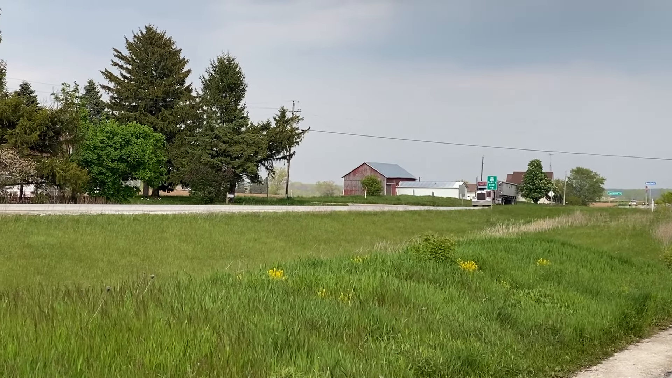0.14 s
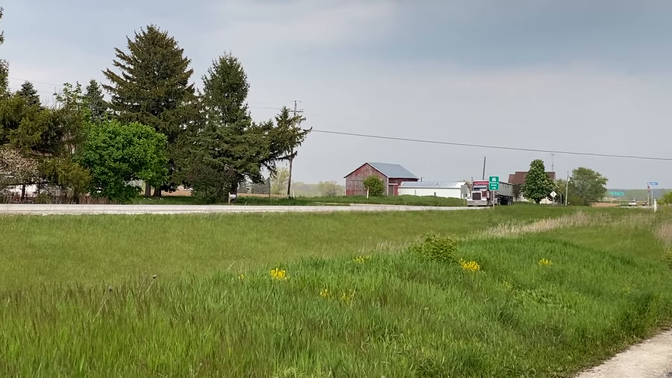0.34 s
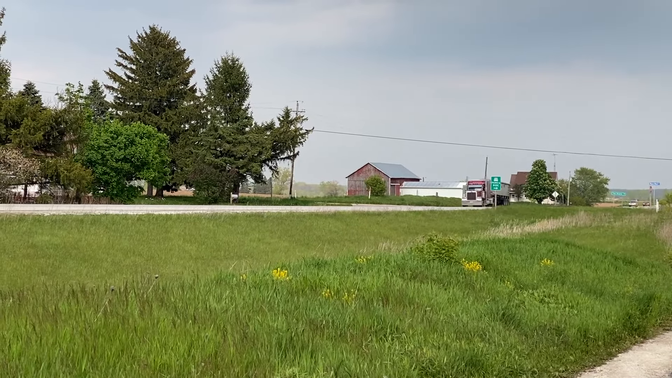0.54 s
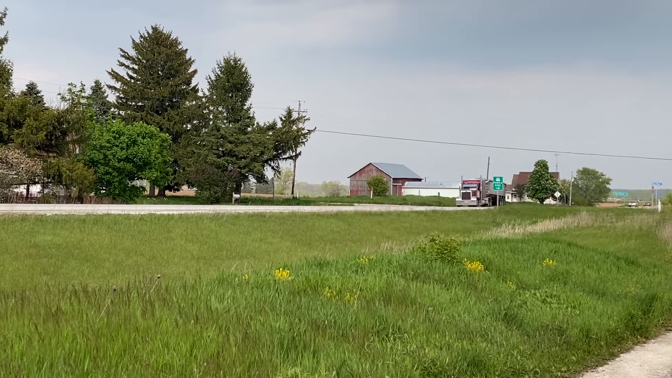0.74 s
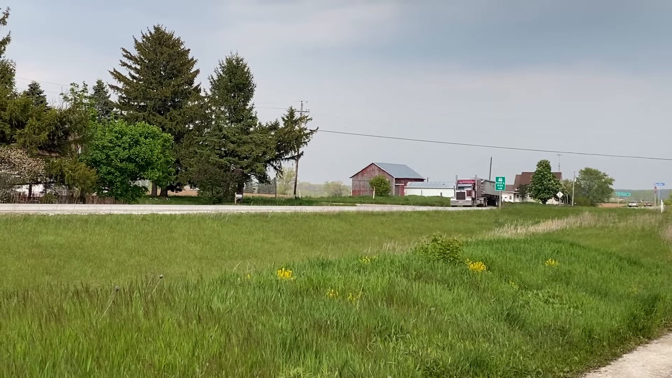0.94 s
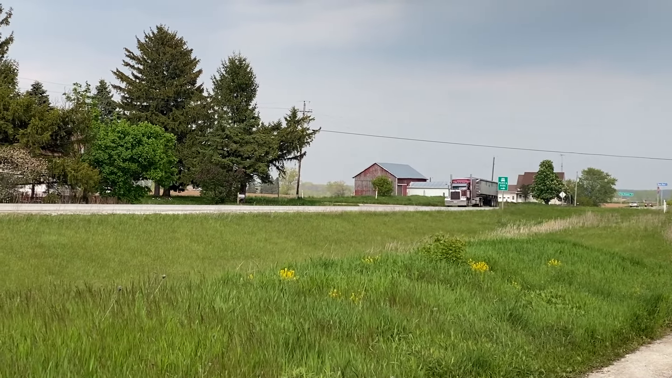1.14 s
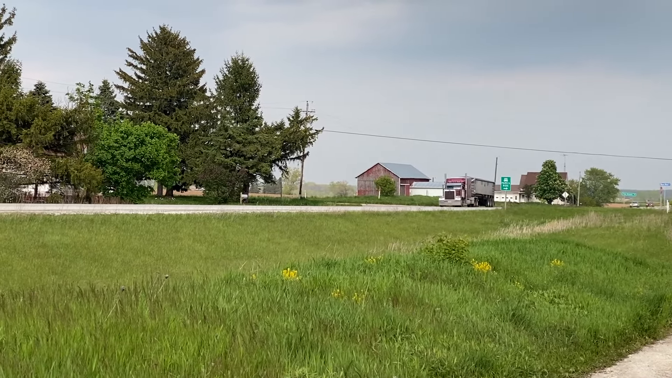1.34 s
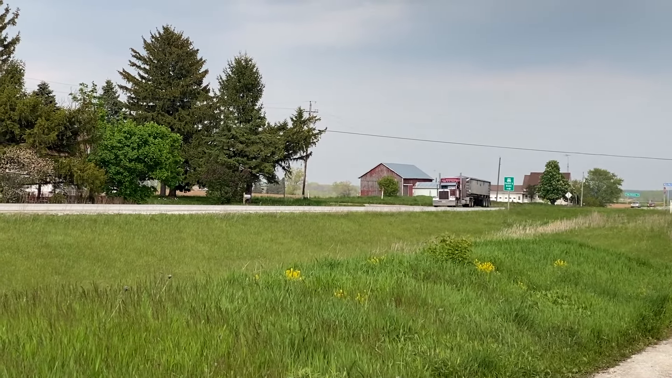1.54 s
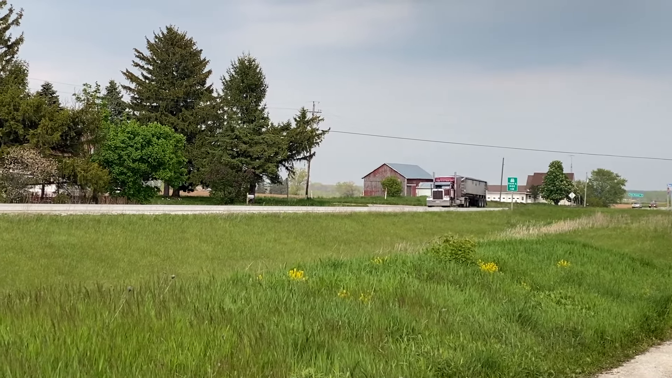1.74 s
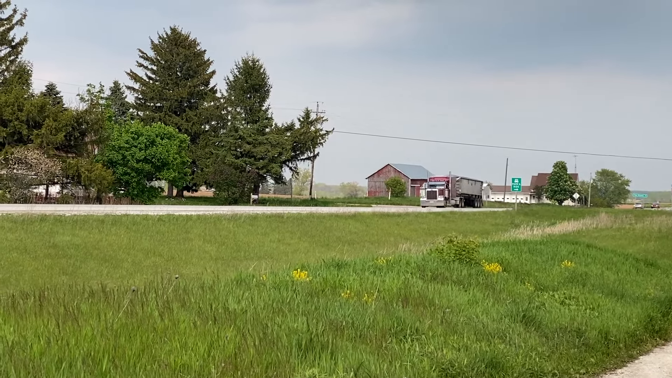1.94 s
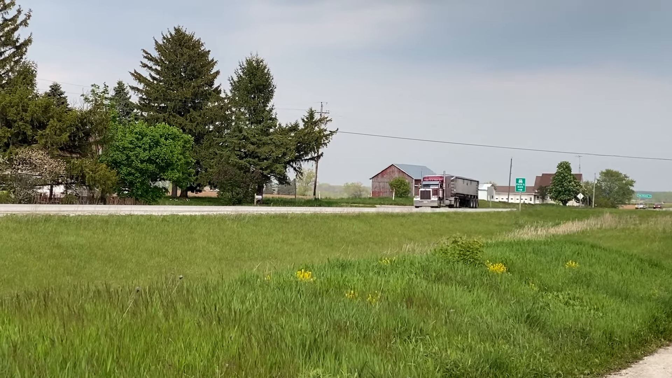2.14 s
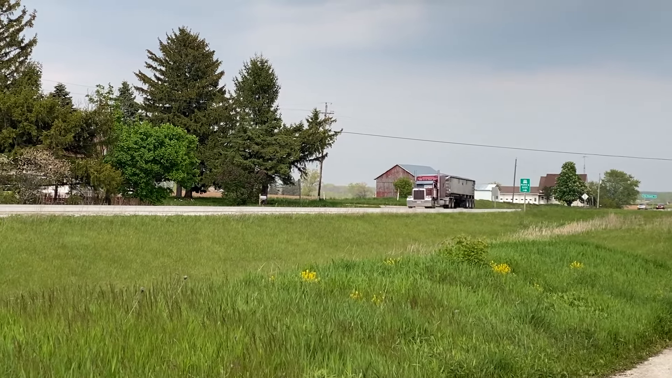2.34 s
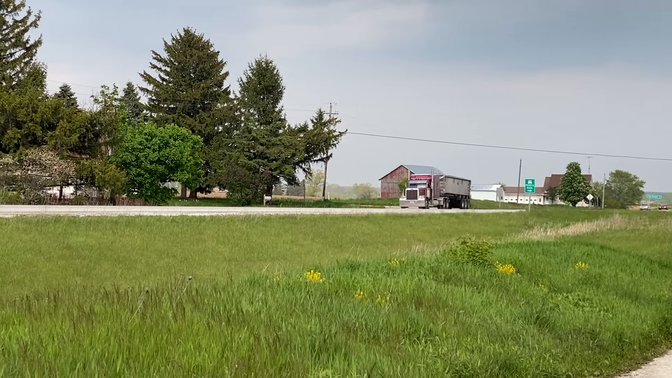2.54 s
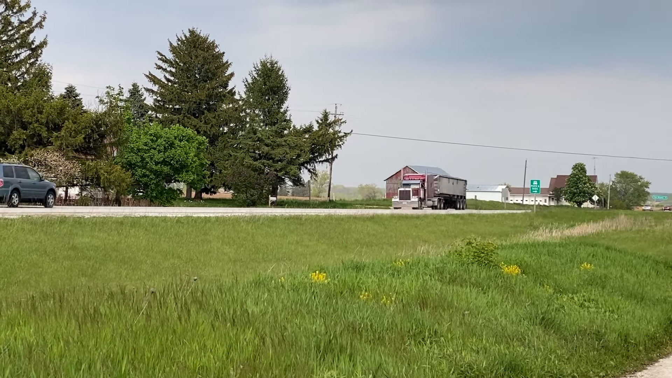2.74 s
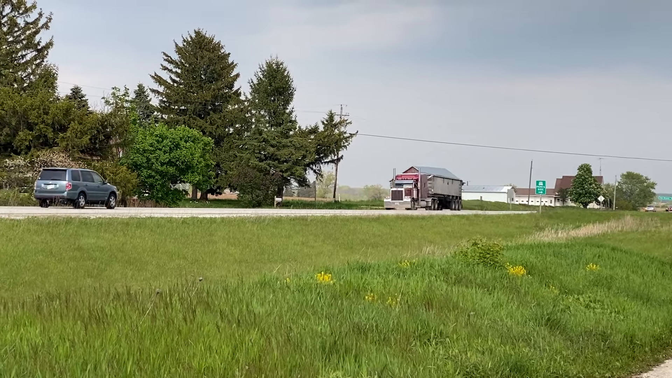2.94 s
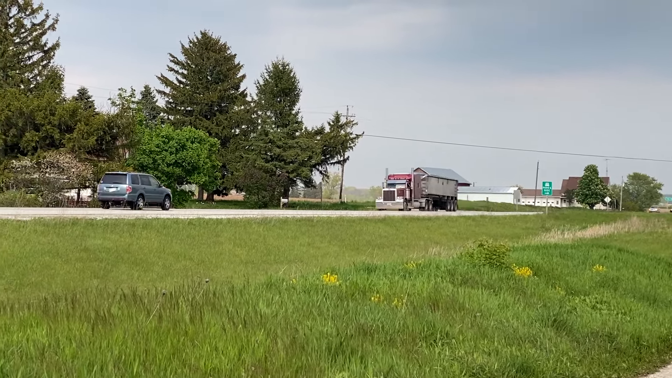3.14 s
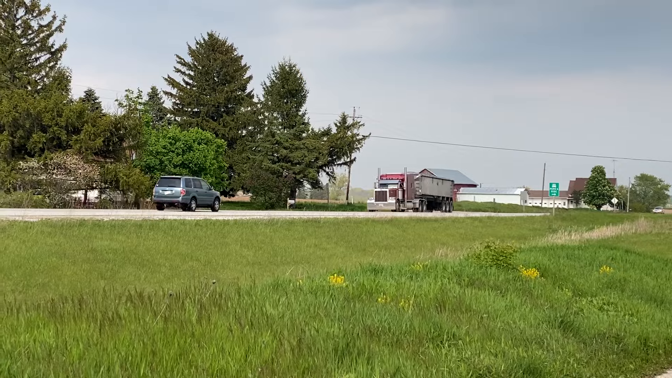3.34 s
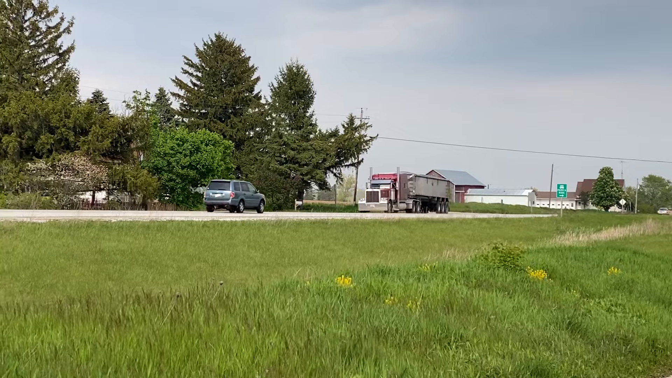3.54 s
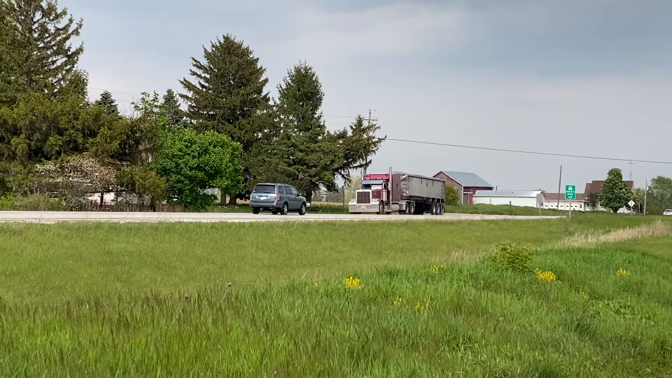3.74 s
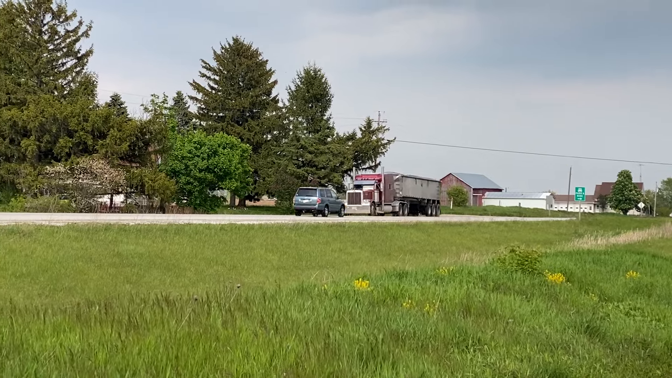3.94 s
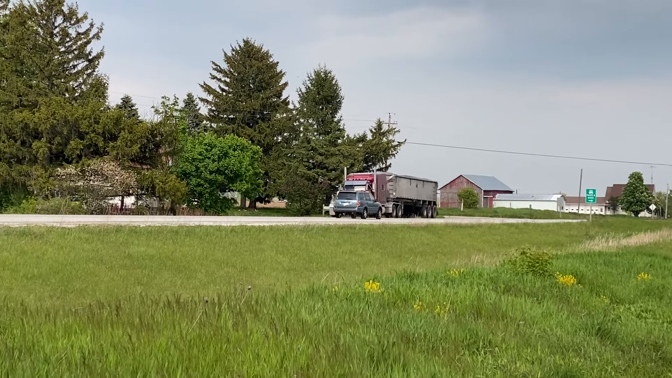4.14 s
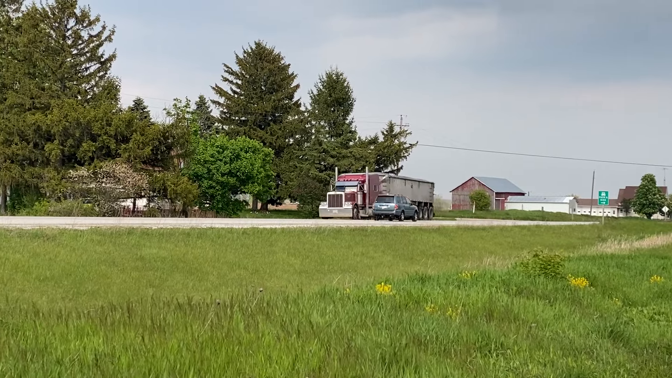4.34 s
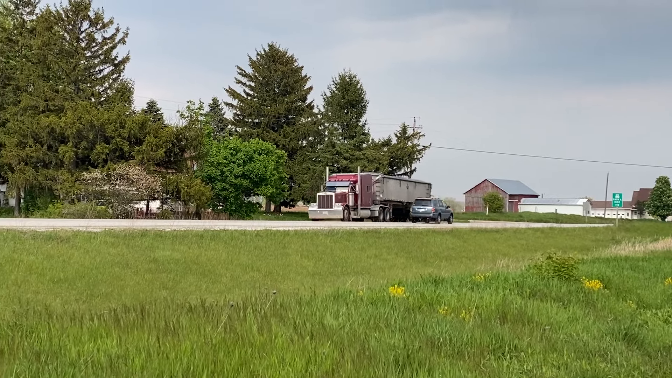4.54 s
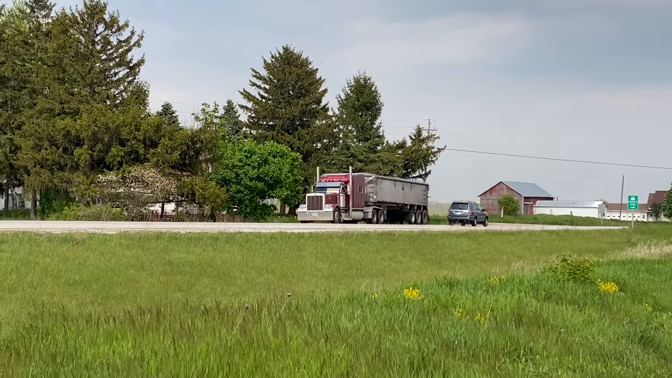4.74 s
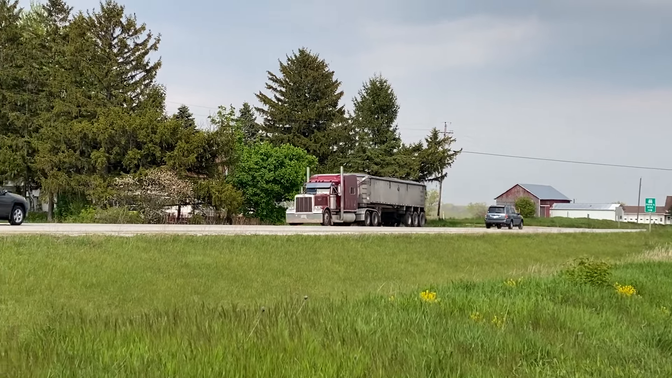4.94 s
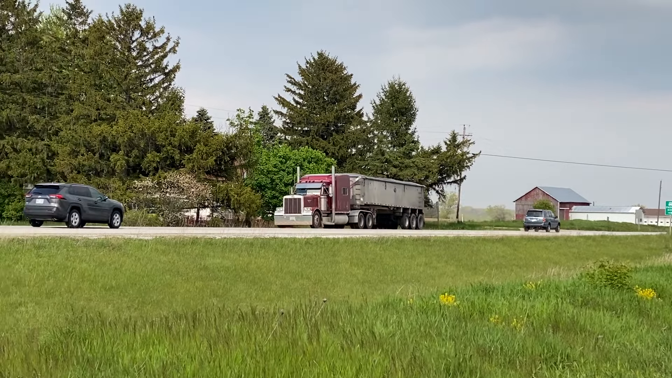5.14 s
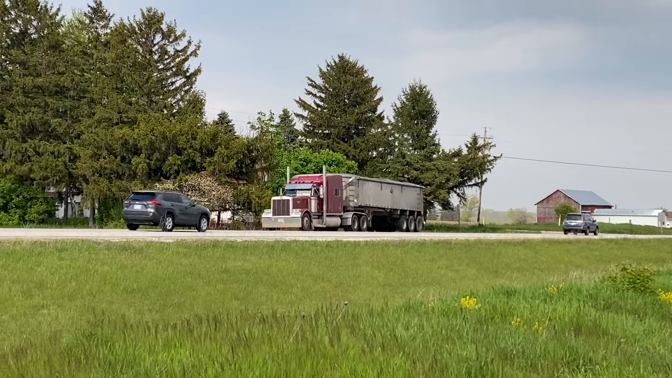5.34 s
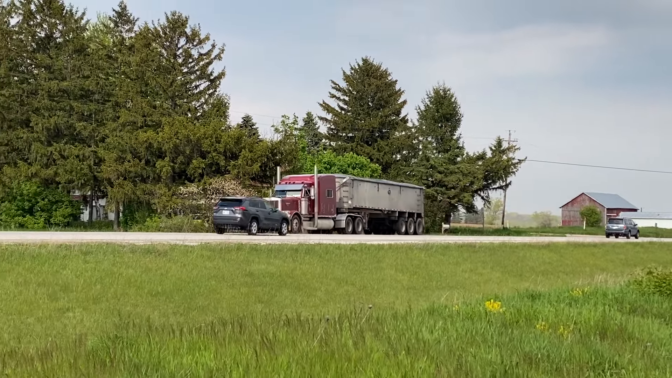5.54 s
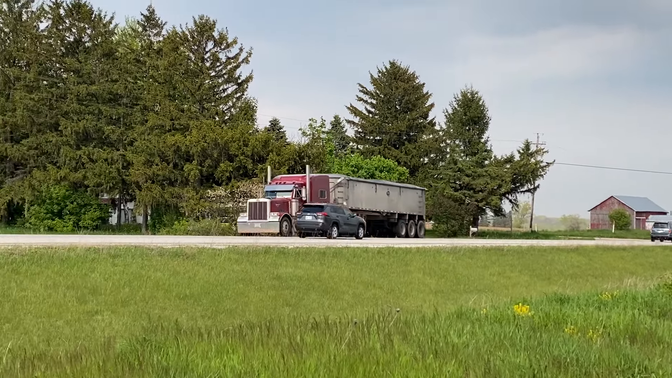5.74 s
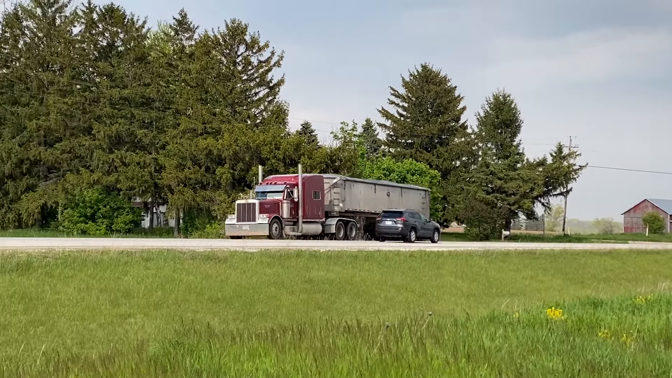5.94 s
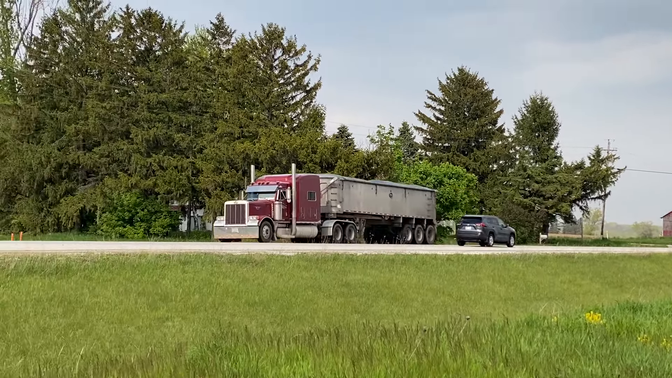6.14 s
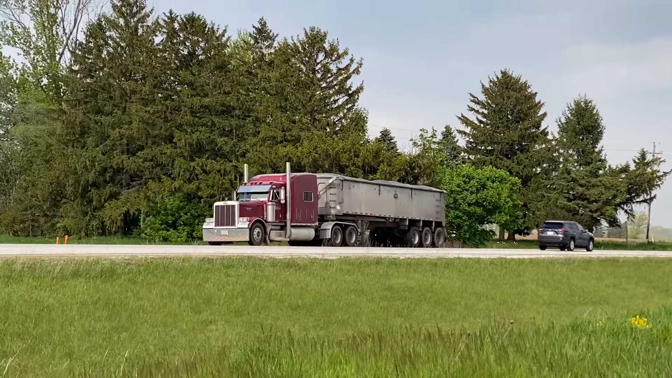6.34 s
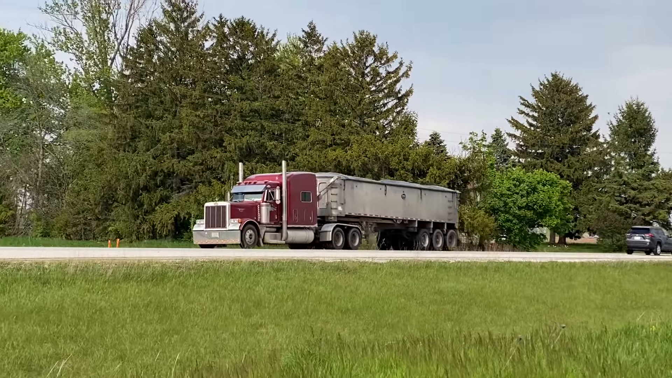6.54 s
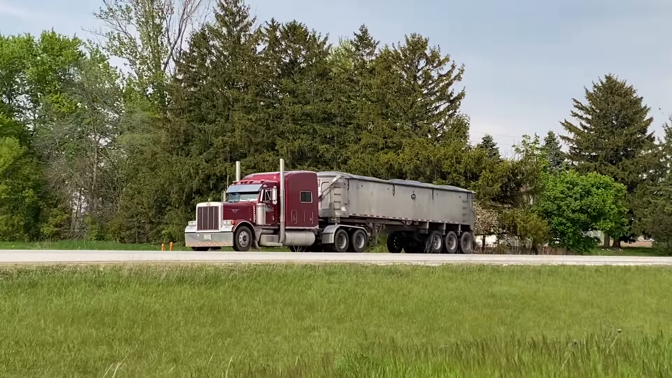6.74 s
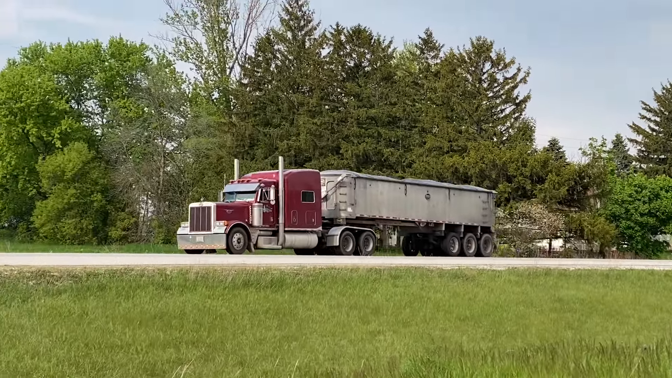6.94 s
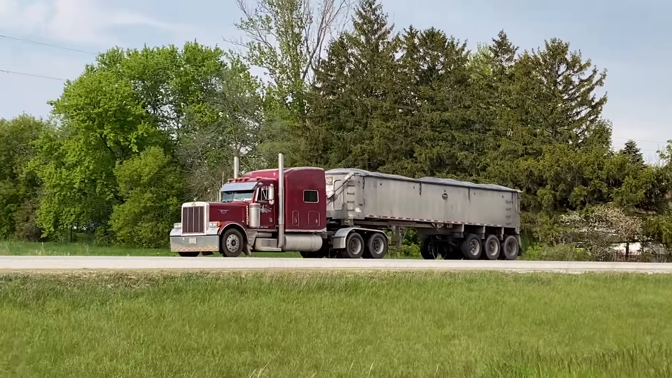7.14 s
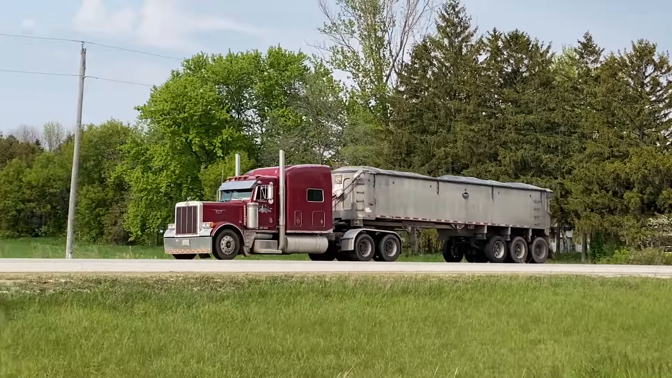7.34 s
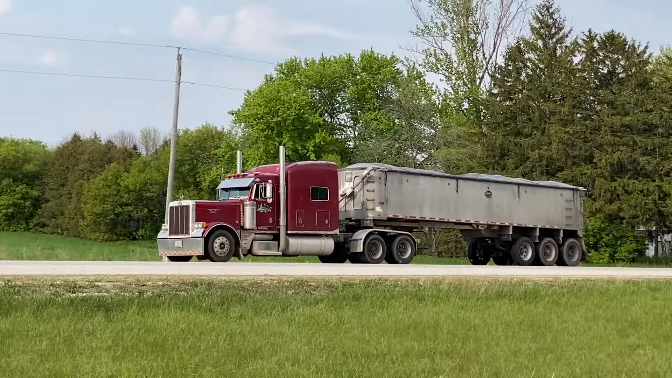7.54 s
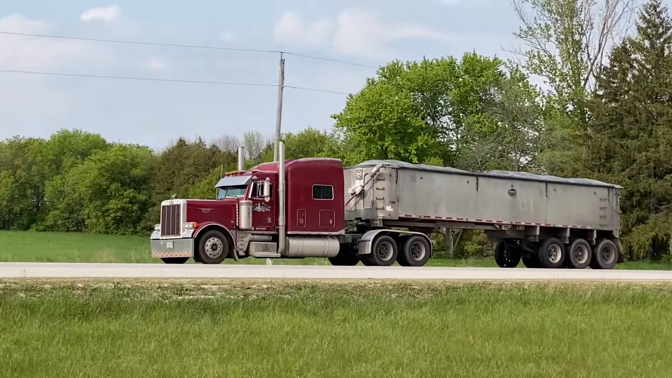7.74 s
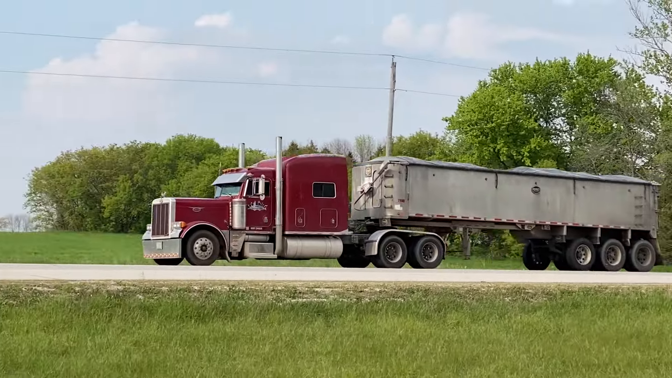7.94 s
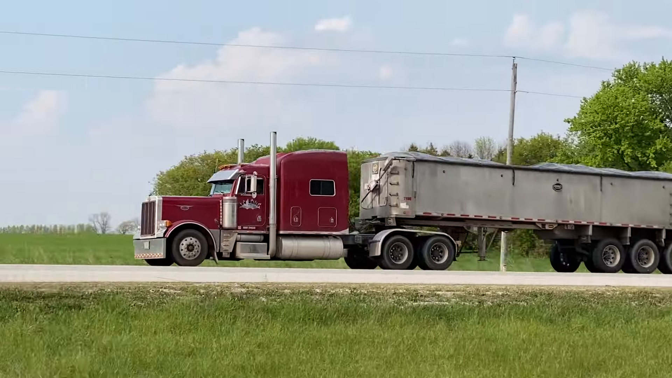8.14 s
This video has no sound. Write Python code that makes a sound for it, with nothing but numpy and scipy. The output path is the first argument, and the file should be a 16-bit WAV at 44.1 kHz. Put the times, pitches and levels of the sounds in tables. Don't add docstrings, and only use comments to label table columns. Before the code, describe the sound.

A stereo microphone across a grass verge hears country traffic. Car tyres hiss away to the left over a distant truck's deep, pulsing engine. Exhaust pops crackle around two seconds, followed by a small falling bird whistle and soft wind thumps. From about six seconds the truck is close: broad tyre roar, uneven diesel throb, high turbo whistle and light ticking from loose trailer fittings.

```python
import sys
import numpy as np
from scipy import signal
from scipy.fft import rfft, irfft, next_fast_len
from scipy.io import wavfile
from scipy.ndimage import uniform_filter1d

SR = 44100
rng = np.random.default_rng(int(sys.argv[2]) if len(sys.argv) > 2 else 0)


def bounce(signal):
    frames = np.transpose(np.atleast_2d(signal))
    limited = np.clip(frames, -1, 1)
    pcm = np.round(limited * 32767).astype(np.int16)
    wavfile.write(sys.argv[1], SR, pcm)


def attenuation_scalar(level_db):
    decades = np.asarray(level_db, float) / 20
    return 10 ** decades


N = 361179
SIZE, HOP = 1024, 256
T = np.arange(N) / SR
HZ = np.fft.rfftfreq(SIZE, 1 / SR)
FRAMES = np.arange(N // HOP + 5) * HOP / SR

# t/s, nearness [0-1]
NEAR = [(0, 0), (5.2, .1), (6.3, 1), (7.2, 1), (8.19, 0.64)]
# t/s, turn [about 0-1]
BROADSIDE = [(0, 0.013), (4.3, 0.049), (5.6, 0.07), (5.85, 0.18), (6.75, 0.26), (7.4, .75), (7.8, 0.85),
             (8.19, 1.08)]
# t/s, share [0-1]
LEAVING = [(0, 1), (1.1, 0.81), (1.7, 0.29), (8.19, 0.1)]
# low edge f/Hz, high edge f/Hz
BANDS = [(380, 600), (650, 1400), (1500, 3000), (3000, 6300), (8000, 12000)]


def evened(x):
    return x / np.sqrt(np.mean(x ** 2) + 1e-20)


def curve(rows, t, col=1):
    rows = np.array(rows, float)
    return np.interp(t, rows[:, 0], rows[:, col])


def read(points, hz):
    f, value = np.transpose(points)
    return np.interp(np.log(hz + 1), np.log(f + 1), value)


def filled(slow):
    return np.interp(T, FRAMES, slow)


def drift(rate_hz):
    hz = np.geomspace(rate_hz / 16, rate_hz, num=16)
    return evened(sum(np.sin(2 * np.pi * (f * FRAMES + p)) for f, p in zip(hz, rng.random(16))))


def resonate(x, hz, width_hz, count):
    turn = np.exp(2j * np.pi * np.cumsum(hz * np.ones(len(x))) / SR)
    r = np.exp(-np.pi * width_hz / SR)
    smoothed = signal.sosfilt([[1 - r, 0, 0, 1, -r, 0]] * count, x * turn.conj())
    return 2 * (turn * smoothed).real


def noise(field_db, patchy_db):
    a, b, patches = rng.standard_normal((len(FRAMES), len(HZ), 3)).T
    patches = uniform_filter1d(patches, size=10, axis=0)
    patches = evened(uniform_filter1d(patches, size=14, axis=1))
    z = (a + 1j * b) * attenuation_scalar(field_db + patchy_db * patches)
    return np.sqrt(8 / 3) * signal.istft(z, nperseg=SIZE, noverlap=SIZE - HOP)[1][:N]


def unit(points):
    db = read(points, HZ)
    return (db - 10 * np.log10(np.sum(attenuation_scalar(db) ** 2)))[:, None]


def approach_db(t):
    speed_m_s, level_s, lane_m = 24.55, 9.01, 40.9
    distance_m = np.hypot(lane_m, speed_m_s * (level_s - t))
    return -20 * np.log10(distance_m / lane_m)


def firing_db(t):
    return -13.5 + 0.78 * approach_db(t) - 1.5 * curve(BROADSIDE, t)


def traffic_db():
    # level/dB when level with us, growth [dB per dB of approach],
    # gain/dB once clear of the verge, gain/dB broadside
    truck_bands = [(-29.5, 1.45, 3, -4), (-28.5, 1.22, 0.34, -2.5), (-37, 1.0, 3, -1), (-49, 0.57, 4, -1),
                   (-59.5, 2, 2.5, -0.5)]
    # loudest level/dB, fall [dB per dB of distance], lag t/s after passing
    car_bands = [(-56.5, 9, 0.77), (-39.5, 0.9, 1), (-47.5, 1.67, -0.17), (-55.5, 2.9, -.2), (-66, 2, .05)]
    # closest t/s, level/dB, brightening [dB per band]
    passes = [
        (1, -16.5, 1),
        (1.58, -0.1, 0.06),
        (3.5, 1.8, -1.0),
    ]
    pass_s = 0.88
    clear_s, clearing_s = 5.95, 0.11

    db, growth, clear_db, side_db = np.transpose(truck_bands)[:, :, None]
    clear = 1 / (1 + np.exp((clear_s - FRAMES) / clearing_s))
    truck_db = db + growth * approach_db(FRAMES) + clear_db * clear + side_db * curve(BROADSIDE, FRAMES)
    power = attenuation_scalar(truck_db) ** 2
    db, fall, lag = np.transpose(car_bands)[:, :, None]
    band = np.arange(len(BANDS))[:, None]
    for s, car_db, bright_db in passes:
        away_db = 10 * np.log10(1 + ((FRAMES - s - lag) / pass_s) ** 2)
        power = power + attenuation_scalar(db + car_db + bright_db * band - fall * away_db) ** 2
    return 10 * np.log10(power)


def wind():
    # t/s, peak level/dB, half length t/s
    gusts = [(.28, -47, .1), (.75, -57, .3), (1.8, -56, 0.19), (2.1, -50, 0.1), (2.4, -46, .12),
             (3.5, -38, .05), (3.78, -37, .12), (4.2, -54, 0.093), (4.78, -40, .09), (5.5, -41, .09)]
    # f/Hz, level/dB per Hz
    wind_tone = [(20, -26.5), (55, 49), (100, 11), (180, 8), (400, -38), (1200, -110)]
    level = attenuation_scalar(-55)
    for s, db, half_s in gusts:
        level = level + attenuation_scalar(db) * np.exp(-((FRAMES - s) / half_s) ** 2)
    field_db = unit(wind_tone) + 20 * np.log10(level) + 3.2
    return np.array([noise(field_db, patchy_db=1.5) * filled(attenuation_scalar(4 * drift(18))) for _ in range(2)])


def bird():
    # t/s, f/Hz, level/dB
    chirp = [(2.62, 4400, -61), (2.67, 4080, -55), (2.72, 3830, -53), (2.77, 3560, -54), (2.85, 3300, -57)]
    on = (T > chirp[0][0]) & (T < chirp[-1][0])
    return on * attenuation_scalar(curve(chirp, T, col=2)) * np.sin(2 * np.pi * np.cumsum(curve(chirp, T)) / SR)


def flank():
    # t/s, level/dB
    hiss_level = [(0, -44), (1.2, -42), (1.6, -43.5), (2.4, -47), (3.2, -45), (4.0, -47), (4.8, -54),
                  (5.5, -71), (6.8, -49), (7.6, -51), (8.19, -50)]
    # f/Hz, level/dB per Hz
    hiss_tone = [(88, -38), (150, -16), (258, -18), (377, -14), (516, -11.5), (787, -1.5), (1350, -13),
                 (1680, -25.5), (1870, -39), (2000, -61), (2600, -79), (4400, -120)]
    hiss = noise(unit(hiss_tone) + curve(hiss_level, FRAMES), patchy_db=2.5)
    song = evened(resonate(rng.standard_normal(N), hz=785, width_hz=130, count=3))
    song_level = attenuation_scalar(curve(hiss_level, T) - 7)
    return hiss + song * song_level * np.clip(curve(LEAVING, T - .5), 0, 1)


def whine():
    # t/s, level/dB
    whine_level = [(.7, -80), (.85, -57), (1.4, -58), (1.6, -80)]
    fuzz = resonate(rng.standard_normal(N), hz=3480, width_hz=170, count=3)
    return attenuation_scalar(curve(whine_level, T)) * evened(fuzz)


def pops(hz, width_hz, gain_db):
    # start t/s, pops in the run, first level/dB, last level/dB
    runs = [(1.654, 6, -31, -24), (1.733, 1, -29, -29), (1.7591, 1, -26, -26), (1.78, 1, -27, -27),
            (1.8062, 3, -30, -23), (1.8467, 1, -24, -24), (1.8725, 1, -23, -23), (1.9409, 2, -24, -28),
            (2.0534, 2, -28, -29), (2.0949, 1, -30, -30)]
    gap_s = .0133
    clicks = np.zeros(N)
    for s, count, first_db, last_db in runs:
        at = np.round((s + gap_s * np.arange(count)) * SR).astype(int) - 45
        clicks[at] = attenuation_scalar(np.linspace(first_db, last_db, count) + gain_db)
    t = np.arange(500) / SR
    ring = t ** 2 * np.exp(-np.pi * width_hz * t) * np.sin(2 * np.pi * hz * t)
    return signal.oaconvolve(clicks, ring / abs(ring).max())[:N]


def rumble():
    tone = [(15, -24.0), (50, 15.5), (110, 6.0), (160, 4.0), (210, -21), (330, -40.0), (1000, -110)]
    return noise(unit(tone) - 41 + 5 * curve(NEAR, FRAMES), patchy_db=3.0)


def rattles():
    # t/s, level/dB
    ticks = [(.208, -55), (4.677, -57), (6.268, -56), (7.074, -49), (7.257, -47), (7.445, -51),
             (7.742, -47), (7.908, -44), (8.005, -48), (8.081, -45)]
    out, t = np.zeros(N), np.arange(900) / SR
    shape = np.exp(-t / .008) * (1 - np.exp(-t / .0015))
    for (s, db), burst in zip(ticks, rng.standard_normal((len(ticks), 900))):
        out[round(s * SR):][:900] += attenuation_scalar(db) * burst * shape
    return signal.sosfilt(signal.butter(4, 7800, "high", fs=SR, output="sos"), out)


def turbo():
    # t/s, f/Hz
    blade_hz = [(0, 7100), (1, 7170), (3, 7150), (4, 7030), (5, 7090), (6, 6964), (7, 6875), (7.5, 6876),
                (8.19, 6730)]
    # t/s, level/dB
    blade_level = [(0, -85), (.5, -78), (.85, -63), (1.35, -84), (2.15, -67), (2.65, -70), (3.15, -56),
                   (3.7, -66), (4.75, -60), (5.05, -64), (5.3, -57.5), (6.0, -54), (6.35, -50.5),
                   (7.05, -51), (7.32, -47.5), (7.68, -42), (7.92, -51.5), (8.19, -42)]
    hz, near = curve(blade_hz, T), curve(NEAR, T)
    jitter = uniform_filter1d(rng.standard_normal(N), size=300)
    jitter = evened(uniform_filter1d(jitter, size=200))
    tone = np.sqrt(2) * np.cos(2 * np.pi * np.cumsum(hz + (9 + 30 * near) * jitter) / SR)
    fuzz = evened(resonate(rng.standard_normal(N), hz, 110, count=3))
    share = np.clip(0.34 + 0.22 * near, 0, 1)
    flutter_db = filled(1.6 * drift(16))
    level = attenuation_scalar(curve(blade_level, T) + flutter_db - 1.3)
    return level * (np.sqrt(1 - share) * tone + np.sqrt(share) * fuzz)


def roar(fire):
    # f/Hz, level/dB per Hz
    car_tone = [(30, 21), (110, -14), (200, -12.5), (420, -7), (800, -12.5), (1100, -6.5), (1350, -7),
                (1700, 2.5), (2300, -10), (3400, -22.5), (5500, -34.5), (7600, -30.5), (8300, -36.5),
                (15000, -46)]
    far_tone = [(30, -13.5), (110, 13.5), (200, -12.5), (350, -1), (800, 3.5), (1150, 1.5), (1400, -8.5),
                (2000, -11), (2800, -19.5), (3500, -17), (5200, -31), (7600, -38), (8300, -46),
                (15000, -62)]
    close_tone = [(30, -22), (110, -20), (200, -6), (350, 5.5), (600, 4), (1150, 0), (1400, -8.5),
                  (2100, -15.5), (2800, -18.5), (3500, -16), (5200, -24.5), (7600, -33), (8300, -48.5),
                  (15000, -48)]
    # f/Hz, share [0-1]
    gate = [(200, .08), (500, .15), (1000, .2), (2000, .16), (4500, .07), (9000, .01)]
    # t/s, f/Hz, gain/dB, half length t/s
    swells = [(.5, 880, -6, 0.62), (1.354, 750, 5, 0.18), (1.8, 980, 4, 0.22), (1.848, 2650, 6, 0.15),
              (2.6, 550, -5, .5), (4.65, 1100, 3, 0.46), (3.1, 10000, -5, .3), (5.4, 404, 3, .4),
              (5.5, 950, 1.5, 0.36), (6.3, 1710, 1.5, 0.19), (6.55, 754, 0.5, .2), (7.55, 564, -2.5, .2),
              (7.8, 1800, 4.5, 0.26), (8.15, 384, 4.5, 0.25), (8.15, 1100, -4, 0.14)]
    swell_octaves = 0.2

    near, car = curve(NEAR, FRAMES), np.clip(curve(LEAVING, FRAMES), 0, 1)
    truck_db = unit(far_tone) + near * (unit(close_tone) - unit(far_tone))
    field_db = truck_db + car * (unit(car_tone) - truck_db)

    have_db = []
    for lo, hi in BANDS:
        inside = (HZ > lo) & (HZ < hi)
        have_db.append(10 * np.log10(np.sum(attenuation_scalar(field_db[inside]) ** 2, axis=0)))
    centres = np.log(np.sqrt(np.prod(BANDS, axis=1)))
    spread = np.array([np.interp(np.log(HZ + 1), centres, row) for row in np.eye(len(BANDS))])
    field_db = field_db + spread.T @ (traffic_db() - have_db)

    for s, hz, db, half_s in swells:
        octaves = np.log2((HZ[:, None] + 1) / hz)
        field_db = field_db + db * np.exp(-(octaves / swell_octaves) ** 2 - ((FRAMES - s) / half_s) ** 2)

    throb = read(gate, HZ)[:, None]
    steady = noise(field_db + 10 * np.log10(1 - throb), patchy_db=0.76)
    gated = noise(field_db + 10 * np.log10(throb), patchy_db=3.0)
    return steady + gated * evened(np.exp(1.2 * np.cos(fire)))


def knock(fire):
    cylinder_db = [4, -10, 2, -9, -1, 2]
    # f/Hz, width f/Hz, level/dB
    block = [(534, 350, -7), (944, 290, 7), (1090, 80, 10.5), (1710, 1400, -17)]
    count = np.floor(fire / (2 * np.pi)).astype(int)
    at = np.flatnonzero(np.diff(count))
    blows = np.zeros(N)
    blows[at] = attenuation_scalar(np.array(cylinder_db)[count[at] % 6] + 4.5 * rng.standard_normal(len(at)))
    ring = sum(attenuation_scalar(db) * resonate(blows, hz, w, count=2) for hz, w, db in block)
    ring = signal.sosfilt(signal.butter(4, 3200, fs=SR, output="sos"), ring)
    return attenuation_scalar(filled(traffic_db()[1]) - 10) * evened(ring)


def cylinders(fire):
    # crank order, level/dB relative to the firing tone
    uneven_far = [(2, -21), (4, -18), (4.5, -27.5), (5, -22.5), (7, -46), (10, -40.5), (11, -35),
                  (14, -29.5), (15, -39), (18, -47), (23, -35)]
    uneven_near = [(2, -19.5), (4, -23), (4.5, -21), (5, -42), (7, -27.5), (10, -23), (11, -25), (14, -27),
                   (15, -41), (18, -28), (23, -22.5)]
    # t/s, level/dB
    gear = [(0, -47), (1.6, -45.5), (2.6, -44), (4.8, -46), (5.6, -38.5), (6.4, -31.5), (6.9, -30.5),
            (7.5, -28.5), (8.19, -36)]
    near, tone_db = curve(NEAR, FRAMES), firing_db(FRAMES)
    crank = fire / 3
    out = filled(attenuation_scalar(curve(gear, FRAMES) + 0.83 * drift(8))) * np.cos(13 * crank)
    for (order, far_db), (_, near_db) in zip(uneven_far, uneven_near):
        level_db = tone_db + far_db + near * (near_db - far_db) + 2.5 * drift(4.1)
        wander = filled(0.37 * drift(3)) + 2 * np.pi * rng.random()
        out += filled(attenuation_scalar(level_db)) * np.cos(order * crank + wander)
    return np.sqrt(2) * out


def exhaust(fire):
    # t/s, gain/dB
    fades = [(.09, -4), (.25, -2.5), (.49, -3.5), (.71, -3), (1.76, -5.5), (1.96, -4.5), (2.17, -2),
             (2.3, -2), (2.76, -1.5), (3.13, -1), (3.58, -3.5), (3.7, -4), (4.1, -1.5)]
    fade_s = 0.034
    # head-on level/dB, growth [dB per s],
    # shares added broadside in step and a quarter turn off
    harmonics = [(-10.5, 0, -.95, -.15), (-28, 0, .31, .04), (-34, 2.9, -.25, -.2), (-38, 0, -.08, -.03),
                 (-36, 1.3, .03, .03)]
    pulse_lag = (.6, -.25)

    near, side = curve(NEAR, FRAMES), curve(BROADSIDE, FRAMES)
    fades_db = sum(db * np.exp(-((FRAMES - s) / fade_s) ** 2 / 2) for s, db in fades)
    shimmer = 1 - 0.72 * near
    out = filled(attenuation_scalar(fades_db + 0.76 * shimmer * drift(22))) * np.cos(fire)
    lag = np.interp(near, (0, 1), pulse_lag)
    for k, (db, db_per_s, share, stray) in enumerate(harmonics, start=2):
        size = attenuation_scalar(db + db_per_s * FRAMES) + (share + 1j * stray) * side
        size = size * attenuation_scalar(1.6 * shimmer * drift(14))
        size = size * np.exp(1j * (0.16 * shimmer * drift(17) - lag * (k - 1)))
        out += (filled(size) * np.exp(1j * k * fire)).real
    return np.sqrt(2) * filled(attenuation_scalar(firing_db(FRAMES))) * out


def scene():
    # t/s, f/Hz
    firing = [(0.0, 77.6), (2.0, 77.46), (4.0, 77.58), (5.2, 77.9), (6.0, 77.22), (6.8, 76.53), (7.6, 76.6),
              (8.19, 75.44)]
    fire = 2 * np.pi * np.cumsum(curve(firing, T)) / SR
    tones = exhaust(fire) + cylinders(fire)
    ahead = tones + knock(fire) + turbo() + roar(fire) + rumble() + bird() + whine() + rattles()
    aside = flank()
    crack = pops(hz=980, width_hz=1000, gain_db=7.5)
    thump = pops(hz=270, width_hz=530, gain_db=-1)
    echo_ring = pops(hz=770, width_hz=500, gain_db=0)
    mid = ahead + .33 * aside + crack + thump
    side = aside + echo_ring - .028 * curve(NEAR, T) * tones
    return np.array([mid + side, mid - side]) + wind()


def roll_off(x):
    return signal.sosfilt(signal.butter(12, 15140, fs=SR, output="sos"), x)


def record(dry):
    # f/Hz, signed share
    ports = [(60, .04), (200, .08), (400, .09), (900, .1), (1500, -.14), (1850, 0), (2250, 0),
             (2800, .3), (4600, .33), (5300, 0), (5600, 0), (5950, -.42), (6400, 0),
             (7850, 0), (8500, 1.3), (9600, .85), (10450, 0), (11550, 0), (12000, -.8), (12800, -1.5),
                  (13300, 0), (13600, 0), (13900, 1), (15000, .5)]
    # f/Hz, gain/dB
    centre_top = [(7300, 0), (7800, -3), (10500, 0), (12500, -3), (12800, -12), (13250, -50), (13650, -50),
                  (13850, -8), (15200, -9)]
    dry = signal.sosfiltfilt(signal.butter(2, 46, "high", fs=SR, output="sos"), dry)
    size = next_fast_len(N)
    hz = np.fft.rfftfreq(size, 1 / SR)
    share = read(ports, hz)
    centre = rfft(dry.mean(0), size)
    side = irfft(1j * share * centre, size)[:N] + (dry[0] - dry[1]) / 2
    mid = irfft(attenuation_scalar(read(centre_top, hz)) * centre, size)[:N]
    return roll_off(np.array([mid + side, mid - side]))


dry = scene()
out = record(dry)
bounce(out)
```